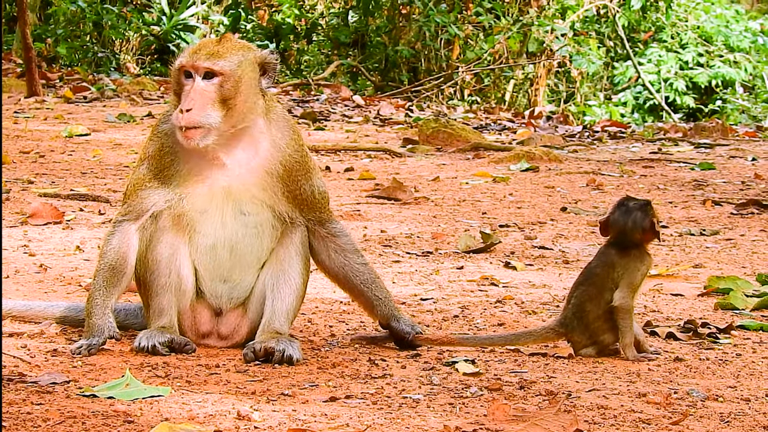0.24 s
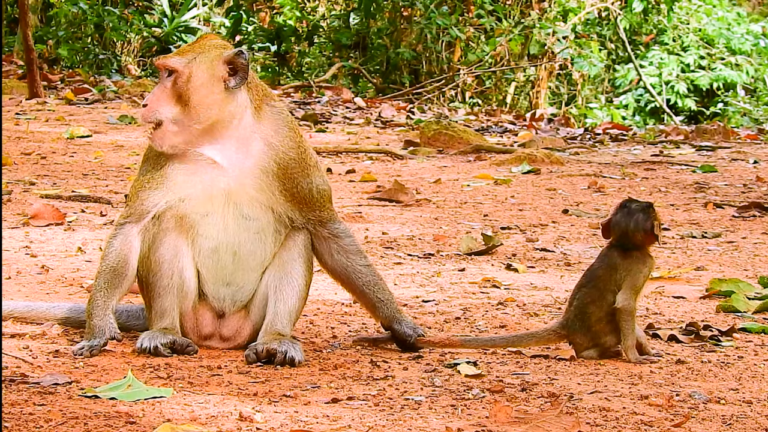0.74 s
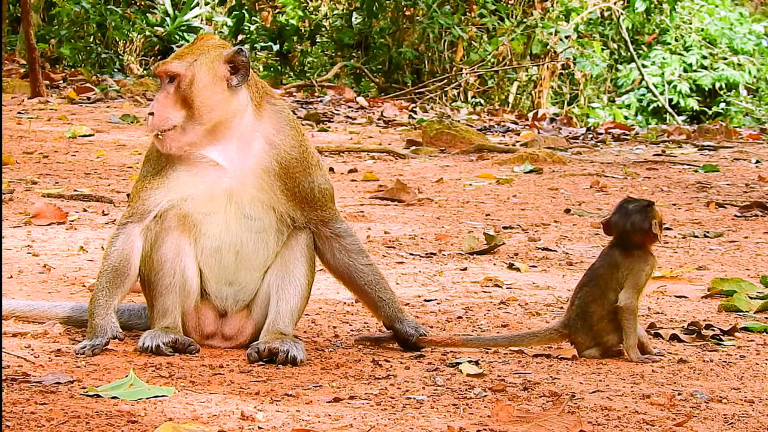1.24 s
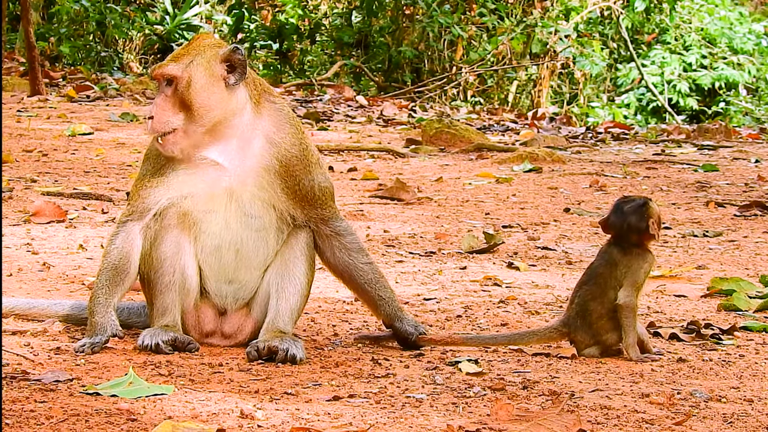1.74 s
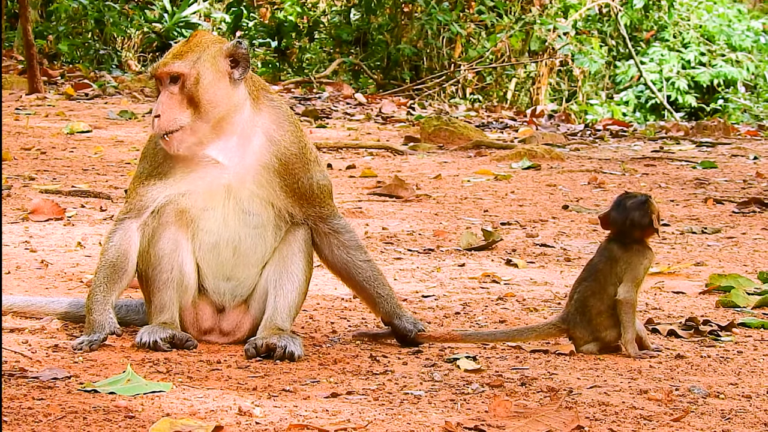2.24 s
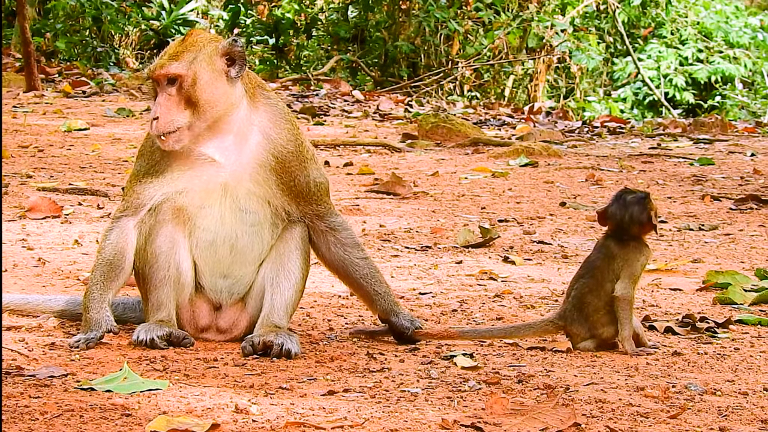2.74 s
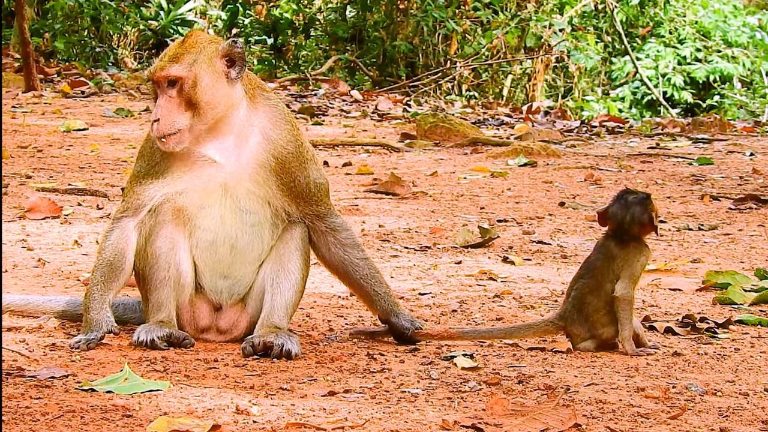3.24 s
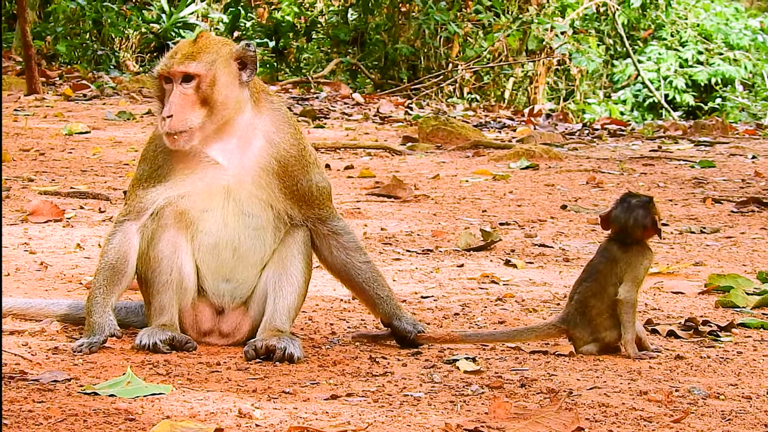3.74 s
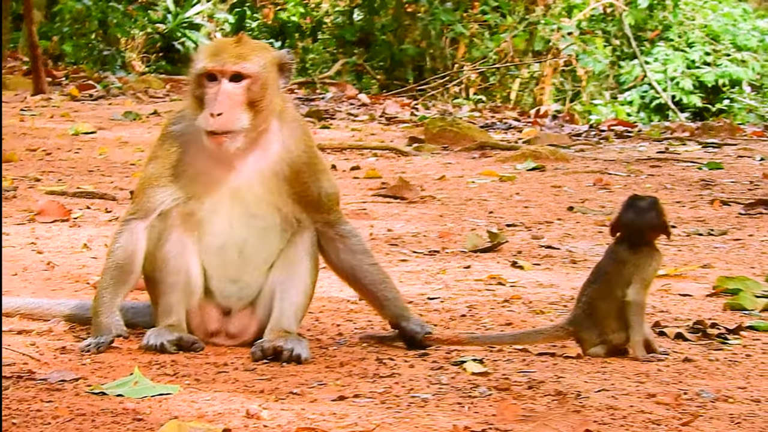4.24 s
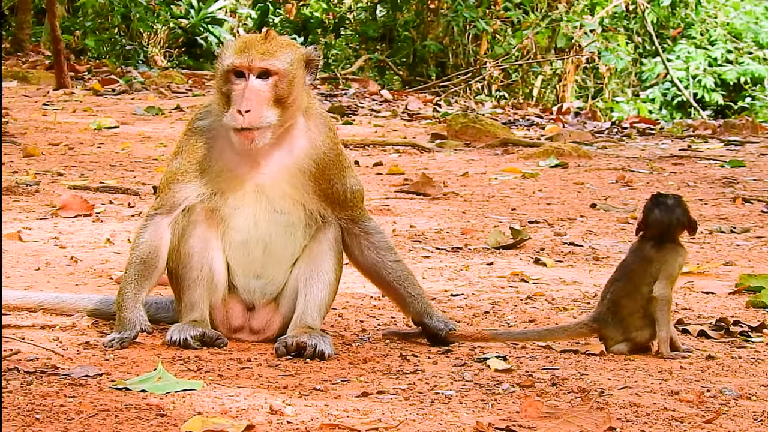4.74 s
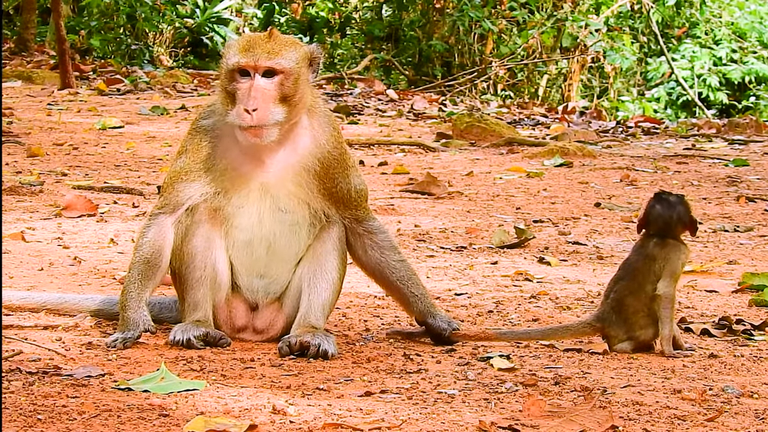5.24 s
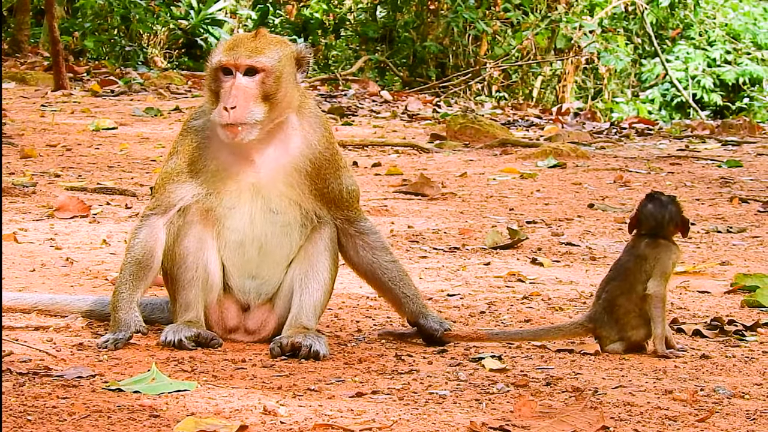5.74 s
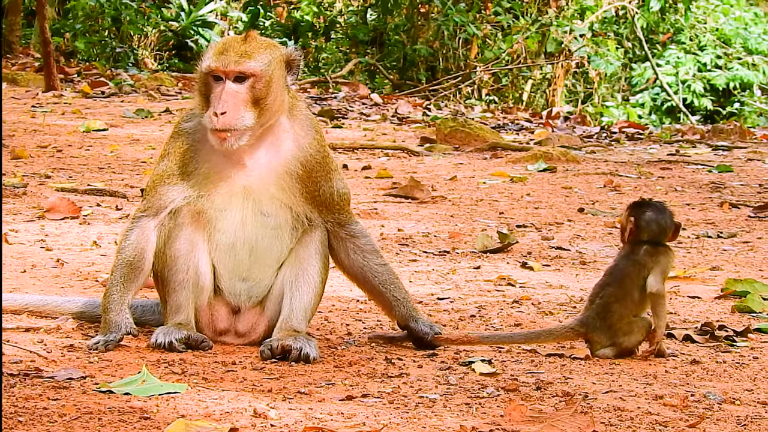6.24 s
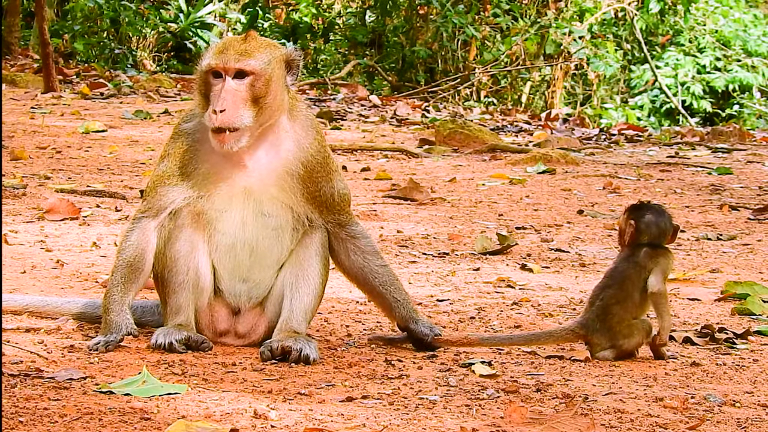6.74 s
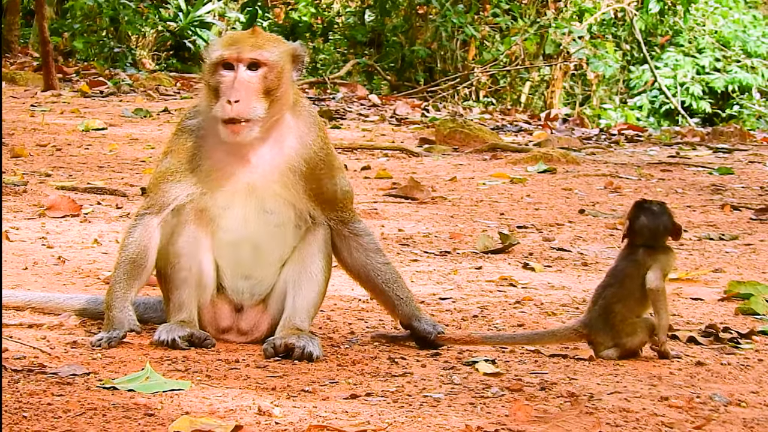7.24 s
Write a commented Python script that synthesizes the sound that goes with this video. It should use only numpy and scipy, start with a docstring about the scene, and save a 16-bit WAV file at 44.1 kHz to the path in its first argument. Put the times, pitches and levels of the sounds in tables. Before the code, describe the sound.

Cicadas buzz steadily in the trees, with a few soft monkey coos, small twig cracks and a distant passing vehicle underneath.

```python
"""Cicadas in a midday clearing

Choirs of cicadas drone in the trees, their tymbal clicks ringing through hollow bodies. Each choir swells
or hushes in its own time, and a few nearer singers buzz through. A monkey coos, thin calls answer, twigs
and leaves tick on the ground, and a vehicle passes far off under a soft breeze.
A quick gain control evens out the level, and the tallest crests of the drone are clipped."""
import sys
import numpy as np
from scipy import signal
from scipy.fft import rfft, irfft, next_fast_len
from scipy.io import wavfile
from scipy.ndimage import uniform_filter1d, map_coordinates

SR = 44100
rng = np.random.default_rng(int(sys.argv[2]) if len(sys.argv) > 2 else 0)


def wav_out(sig):
    """Save sig, one row per channel (or a flat mono array), as 16-bit PCM at SR to the path in sys.argv[1]."""
    wavfile.write(sys.argv[1], SR, np.round(np.clip(np.atleast_2d(sig).T, -1, 1) * 32767).astype(np.int16))


N = 330734

# Tone colours of the noise beds. Each row: frequency in Hz, relative level in dB.
LEAF_SPECTRUM = [(88, -29), (150, 4), (278, -6.5), (368, -9), (448, -16), (577, -15), (2590, -13.5),
                 (3680, -15), (4300, -12), (5590, -1), (9460, -120)]
HISS_SPECTRUM = [(6000, -30), (9000, 12.5), (10500, 0.5), (12000, -9.5), (15500, -20), (17000, -60)]
TYRE_SPECTRUM = [(88, -24), (150, -5.5), (206, -4.5), (264, -4.5), (306, -2), (739, -9.5), (2040, -22.5),
                 (2950, -34), (3500, -19.5), (4550, -54), (7700, -120)]
BOOM_SPECTRUM = [(12, -32), (25, -6), (35, -1.5), (50, -10), (66, 0.5), (80, -1.5), (96, -1.5), (130, 3.5),
                 (200, -2), (300, -11), (570, -120)]
# The vehicle's pass. Each row: time in seconds, tyre roar level in dB.
PASS_BY = [(0, -60), (.5, -57), (1.2, -50.5), (1.9, -55.5), (2.3, -49.5), (2.7, -51.5), (3.4, -50.5),
           (3.85, -52), (4.25, -55.5), (5, -60.5), (6.1, -65), (7.5, -65)]
# One surge for each engine tone. Each phrase: levels before, during and after in dB, then four times in
# seconds that, taken in rising order, mark where the move starts, levels off, resumes and ends.
THROB_PHRASE = (-74, -59, -69.5, -2, 3.5, 4, 6.5)
HUM_PHRASE = (-62, -55, -68.5, 2, 1.8, 3.5, 3.9)
WHINE_PHRASE = (-85, -63, -106, -5, .5, 3.5, 3)
MURMUR_PHRASE = (-69.5, -58, -80, 0, 1.7, 3.4, 2)
REV_PHRASE = (-1.5, 9.5, -3, 3, 2, 3.5, 5)  # rides on top of the vehicle's drone level
# Twigs and leaves. Each row: start in seconds, crack peak in dB, thud level in dB, crack pitch in Hz.
GROUND_TICKS = [(0.3392, -41.5, -50, 1050), (0.4971, -30.5, -40, 1230), (0.5092, -34, -38, 1070),
                (2.07, -36, -61, 1060), (4.22, -45, -62, 1070), (4.2543, -44, -56, 2100),
                (4.268, -42, -57, 2200), (4.2801, -38.5, -46, 2040)]
# Far calls. Each row: start and length in seconds, first and last pitch in Hz, level in dB.
FAR_PEEPS = [(3.093, .05, 2370, 2350, -66), (3.15, 0.18, 2490, 2610, -67), (4.98, 0.045, 1924, 2130, -62.5),
             (5.781, 0.093, 818, 880, -63.5), (5.787, 0.07, 2120, 1940, -65.5),
             (6.29, 0.16, 2330, 2430, -77), (6.296, .035, 3050, 3150, -65), (6.352, 0.071, 1650, 1660, -68),
             (6.454, 0.034, 2320, 2200, -65), (6.455, 0.078, 1770, 1680, -68.5)]
# The monkey's melody, one list a coo. Each row: time in seconds, pitch in Hz, level in dB.
COO_CONTOURS = [
    [(1.265, 886, -55), (1.309, 900, -49), (1.337, 980, -57), (1.371, 1032, -44.5), (1.477, 1183, -46),
     (1.609, 1220, -44.5), (1.655, 932, -56)],
    [(1.82, 1006, -54), (1.84, 1103, -44), (1.858, 1147, -55.5), (1.92, 1277, -42), (1.996, 1250, -45),
     (2.03, 1200, -46.5), (2.055, 1010, -51)],
    [(3.91, 911, -59), (3.916, 910, -52.5), (4.03, 1024, -50), (4.116, 1049, -44.5), (4.188, 1073, -50),
     (4.204, 1046, -48), (4.222, 910, -64)],
    [(4.62, 1103, -55), (4.698, 1050, -49.5), (4.744, 1178, -50.5), (4.79, 1208, -48.5),
     (4.892, 1204, -44.5), (4.934, 1115, -51), (4.946, 1038, -53)],
    [(5.14, 1007, -56), (5.15, 1075, -52), (5.246, 1232, -48.5), (5.326, 1287, -47), (5.396, 1264, -47),
     (5.418, 1177, -52), (5.432, 1045, -59)],
    [(7.148, 946, -57), (7.162, 980, -55), (7.316, 1047, -49.5), (7.384, 1144, -45.5), (7.424, 1197, -48),
     (7.48, 1090, -46), (7.5, 1084, -53)],
]
# The brightness of each coo. Each row: lift of the second and of the third partial in dB.
COO_BRIGHTNESS = [(-5, 3), (-4, -4), (1, 3.5), (2, -2), (0, 1), (2.5, 3)]
# The throat's resonances. Each row: frequency in Hz, overtone level against the fundamental in dB.
THROAT_RESPONSE = [(1700, -18), (2000, -28), (2280, -27), (2400, -11), (2560, -10), (2750, -32),
                   (3080, -10), (3450, -16), (3580, -27), (3900, -30)]
# Near singers and far choirs of cicadas. Each row: clicks per second, then the body's modes,
# each with centre in Hz, width in Hz and level in dB.
SOLO_VOICES = [(447.3, [(7980, 1140, 0)]), (391.4, [(6880, 870, 16), (7600, 2400, -5)]),
               (312.5, [(3967, 480, 0)])]
CHOIR_VOICES = [(330, [(4835, 326, -5), (5930, 470, 0), (6164, 280, -11.5)]), (350, [(4505, 290, 6.5),
                (9360, 1140, -8.5)]), (400, [(6466, 400, 0)]), (410, [(7204, 324, 0)]),
                (420, [(5895, 300, -1), (6894, 370, 4.5), (7810, 430, 2)]), (450, [(5183, 265, -9),
                (5435, 577, -1), (6197, 250, 1.5), (7170, 790, -3.5), (7405, 274, 1.5), (8297, 367, -7)])]
# Their swells and hushes. Each row: one voice's phrase, laid out like the engine's.
SOLO_DYNAMICS = [(-54, -45.5, -60, 0, 1.2, 3.6, 4.4), (-46, -41, -70, 0, 1.2, 2, 2.9),
                 (-65, -56.5, -70, 0, 3.3, 3.7, 4.3)]
CHOIR_DYNAMICS = [(-46.5, -31, -50.5, 0.44, 2.7, 3.84, 5.5), (-58.5, -44, -52, 2.2, 3.26, 4.5, 4.46),
                  (-35, -30.5, -32.5, 4.02, 4.2, 4.8, 7.1), (-34.5, -31.5, -34, 4.1, 5, 5.8, 7.2),
                  (-33, -38, -34.5, 2.65, 2.4, 4.6, 5.6), (-32, -35.5, -31.5, 1, 2.2, 1.74, 4.2)]
# How the air over the distance colours the cicadas on the way. Each row: frequency in Hz, gain in dB.
DISTANCE_EQ = [(3000, -2.5), (4500, 1), (8500, 0), (11000, -12), (16000, -9)]
# The stereo image, wider in the treble. Each row: frequency in Hz, side against mid in dB.
STEREO_WIDTH = [(60, -18), (180, -18), (540, -12), (1000, -12), (1610, -10), (2780, -9), (4810, -5.5),
                (8320, -3.5), (12000, -2)]


def amp(db):
    """Gain of a level in dB."""
    return 10 ** (np.asarray(db) / 20)


def unit(x):
    """x at rms 1."""
    return x / np.sqrt(np.mean(x ** 2) + 1e-20)


def along(points, hz):
    """Read a curve of (Hz, value) points on a log frequency axis."""
    freqs, values = np.transpose(points)
    return np.interp(np.log(hz + 1), np.log(freqs + 1), values)


def curves(rows):
    """One value per sample for each column after the time."""
    times, *columns = np.transpose(rows)
    return [np.interp(np.arange(N) / SR, times, column) for column in columns]


def phrase(before_db, during_db, after_db, *times):
    """A level in dB that moves to a plateau, holds and moves on."""
    return np.interp(np.arange(N) / SR, np.sort(times), [before_db, during_db, during_db, after_db])


def wobble(rate):
    """A smooth random curve, rate knots a second."""
    return map_coordinates(rng.standard_normal(int(N * rate / SR) + 4), [np.arange(N) * rate / SR])


def filtered(x, response):
    """Filter x by a complex response, a function of Hz."""
    size = next_fast_len(N + SR // 2)
    return irfft(rfft(x, size) * response(np.fft.rfftfreq(size, 1 / SR)), size)[..., :N]


def stereo(mid_side, spectrum=((1, 0),), left_lead_s=14e-6):
    """Colour a mid and a side signal and spread them over two microphones, the left a touch early."""
    def matrix(hz):
        spread = np.arctan(amp(along(STEREO_WIDTH, hz)))
        lead = np.exp(1j * np.pi * hz * left_lead_s)
        mid, side = amp(along(spectrum, hz)) * [np.cos(spread), np.sin(spread)]
        return np.array([[mid * lead, side * lead], [mid / lead, -side / lead]])
    return filtered(mid_side, matrix).sum(axis=1)


def rush(spectrum, patchy_db):
    """Coloured stereo noise of rms 1 that flickers in patches of time and frequency."""
    cells = signal.stft(rng.standard_normal((2, N)), nperseg=512)[2]
    patches = uniform_filter1d(rng.standard_normal(cells.shape[1:]), size=5, axis=0)
    patches = unit(uniform_filter1d(patches, size=12, axis=1))
    noise = signal.istft(cells * amp(patchy_db * patches), nperseg=512)[1][:, :N]
    return unit(stereo(noise, spectrum))


def blurred_tone(hz, width_hz):
    """A tone blurred into a band of noise."""
    phase = 2 * np.pi * np.cumsum(hz * np.ones(N)) / SR
    return unit(wobble(width_hz) * np.sin(phase) + wobble(width_hz) * np.cos(phase))


def forest(x, t60, wet_db):
    """The direct sound plus its own scatter off trunks and leaves, as mid and side."""
    t = np.arange(SR // 3) / SR
    echoes = rng.standard_normal((2, len(t))) * amp(-60 * t / t60)
    echoes *= amp(wet_db) / np.linalg.norm(echoes[0])
    echoes[0, 0] = 1  # the direct sound, in the mid only
    return signal.oaconvolve(x[None], echoes, axes=1)[:, :N]


def air(calming_db_per_s=.5, gust_db=1.5):
    """A slowly calming breeze in the leaves, and a thin hiss above the cicadas."""
    hiss = amp(-56) * rush(HISS_SPECTRUM, patchy_db=1.5)
    breeze_db = -55.5 - calming_db_per_s * np.arange(N) / SR + gust_db * wobble(2.88)
    return amp(breeze_db) * rush(LEAF_SPECTRUM, patchy_db=3.5) + hiss


def vehicle():
    """Tyre roar, engine boom and body drone swell together as it passes; each engine tone surges once."""
    roar_db, = curves(PASS_BY)
    mean_db = roar_db.mean()
    swell_db = roar_db - mean_db
    tyres = amp(roar_db + wobble(5.07)) * rush(TYRE_SPECTRUM, patchy_db=1.5)
    tyres *= amp([[.9], [-.9]])  # leaning left
    boom = amp(mean_db - .5 + .49 * swell_db) * rush(BOOM_SPECTRUM, patchy_db=1.1)
    throb = amp(phrase(*THROB_PHRASE)) * blurred_tone(hz=66, width_hz=17)
    hum = amp(phrase(*HUM_PHRASE)) * blurred_tone(hz=96, width_hz=16)
    drone_hz = np.interp(np.arange(N) / SR, [4.2, 6], [269.7, 261.7])  # sinks as the vehicle leaves
    drone_db = mean_db - 6 + .61 * swell_db + phrase(*REV_PHRASE)
    drone = amp(drone_db) * blurred_tone(drone_hz, width_hz=45)
    whine = amp(phrase(*WHINE_PHRASE)) * blurred_tone(hz=730, width_hz=120)
    murmur = amp(phrase(*MURMUR_PHRASE)) * blurred_tone(hz=1000, width_hz=600)
    return tyres + boom + throb + hum + drone + whine + murmur


def ground_ticks(crack_t60=.029, ring_t60=.0013, thud_t60=.14, thud_hz=290):
    """Dry twigs and leaves crack, each ringing broadly at its own pitch over a dull thud of soil."""
    ticks = np.zeros((2, N + SR))
    t = np.arange(SR // 8) / SR
    for start, peak_db, thud_db, hz in GROUND_TICKS:
        ring = t * amp(-60 * t / ring_t60) * np.cos(2 * np.pi * hz * t)
        burst = amp(-60 * t / crack_t60) * rng.standard_normal((2, len(t)))
        crack = signal.fftconvolve(burst, ring[None], axes=1)[:, :len(t)]
        crack *= amp(peak_db) / np.abs(crack[0]).max()
        crack[0] += amp(thud_db - 60 * t / thud_t60) * np.sin(2 * np.pi * thud_hz * t)
        ticks[:, round(start * SR):][:, :len(t)] += crack
    return stereo(ticks[:, :N])


def peeps():
    """Thin far calls, each a short unsteady glide."""
    calls = np.zeros(N)
    shake_hz = 35 * wobble(149)
    for start, length, first_hz, last_hz, db in FAR_PEEPS:
        progress = np.linspace(0, 1, round(length * SR))
        hz = first_hz + (last_hz - first_hz) * progress + shake_hz[:len(progress)]
        arch = np.sqrt(np.abs(np.sin(np.pi * progress)))
        calls[round(start * SR):][:len(hz)] += amp(db) * arch * np.sin(2 * np.pi * np.cumsum(hz) / SR)
    flutter = amp(4.5 * wobble(90))
    return forest(calls * flutter, t60=.25, wet_db=-3)


def monkey(fade_s=.011, dulling_s=.05):
    """Coos of three partials on a shaky glide; the overtones bloom at throat resonances and die first."""
    t = np.arange(N) / SR
    hz, db = curves(np.concatenate(COO_CONTOURS))
    starts, stops = np.array([(coo[0][0], coo[-1][0]) for coo in COO_CONTOURS]).T
    nearest_coo = np.abs(t[:, None] - np.clip(t[:, None], starts, stops)).argmin(axis=1)
    elapsed, remaining = t - starts[nearest_coo], stops[nearest_coo] - t
    gate = np.clip(np.minimum(elapsed, remaining) / fade_s + 1, 0, 1)
    dull_db = -12 * np.clip(1 - remaining / dulling_s, 0, 1)
    shake = .0051 * (wobble(120) + wobble(35))
    phase = 2 * np.pi * np.cumsum(hz * (1 + shake)) / SR
    voice = amp(1.55 * wobble(60)) * np.sin(phase)
    breath = wobble(250)  # roughens the overtones' phase
    for k, bright_db in enumerate(np.transpose(COO_BRIGHTNESS), 2):
        flicker_db = .9 * k * np.minimum(wobble(45) * 1.6, 1)
        overtone_db = along(THROAT_RESPONSE, k * hz) + bright_db[nearest_coo] + dull_db + flicker_db
        voice += amp(overtone_db) * np.sin(k * phase + .055 * k ** 2 * breath)
    return forest(gate * np.sqrt(2) * amp(db) * voice, t60=.6, wet_db=-15)


def tymbal(rate, drift, jitter, scatter_db, count=4500):
    """One cicada's click train: the pace drifts, each click a little early or late, strong or weak."""
    gaps = 1 + drift * unit(uniform_filter1d(rng.standard_normal(count), size=5))
    beats = np.cumsum(gaps) + rng.random() + jitter * rng.standard_normal(count)
    strengths = amp(scatter_db * rng.standard_normal(count))
    return np.bincount((beats / rate * SR).astype(int), strengths, N)[:N]


def cicada_body(clicks, modes):
    """Tymbal plate and hollow abdomen share their pitches, so each mode acts twice; the distance dulls the top."""
    def response(f):
        ring = sum(amp(db) * (1j * f * width / (hz * hz - f * f + 1j * f * width)) ** 2
                   for hz, width, db in modes)
        return ring * amp(along(DISTANCE_EQ, f))
    return unit(filtered(clicks, response))


def cicada_soloists():
    """Near singers, steady and dry enough for the click rate to come through as a buzz."""
    buzz = 0
    for (rate, modes), dynamics in zip(SOLO_VOICES, SOLO_DYNAMICS):
        clicks = forest(tymbal(rate, drift=.002, jitter=.04, scatter_db=2), t60=.2, wet_db=-4)
        buzz += amp(phrase(*dynamics)) * cicada_body(clicks, modes)
    return buzz


def cicada_choirs(singers=3):
    """Far singers of each kind, each on its own tree and at its own pace, melt into a drone."""
    drone = 0
    for (rate, modes), dynamics in zip(CHOIR_VOICES, CHOIR_DYNAMICS):
        paces = rate * (1 + .08 * rng.standard_normal(singers))
        clicks = sum(forest(tymbal(pace, drift=.015, jitter=.03, scatter_db=1.2), t60=.29, wet_db=7.5)
                     for pace in paces)
        drone += amp(phrase(*dynamics)) * cicada_body(clicks, modes)
    return drone


def scene():
    """The animals in the trees over ground, road and air, in stereo."""
    animals = cicada_choirs() + cicada_soloists() + monkey() + peeps()
    return stereo(animals) + ground_ticks() + vehicle() + air()


def record(dry, ceiling=.175, top_hz=15830):
    """A quick gain control evens the level, clipped crests tick in the treble, and the very top is cut."""
    power = np.abs(uniform_filter1d(np.mean(dry ** 2, axis=0), size=1500, mode="reflect"))
    gain = (power / np.mean(power) + 1e-9) ** -.3
    clipped = np.clip(dry * gain, -ceiling, ceiling)
    return filtered(clipped, lambda hz: hz < top_hz)


dry = scene()
out = record(dry)
wav_out(out)
```